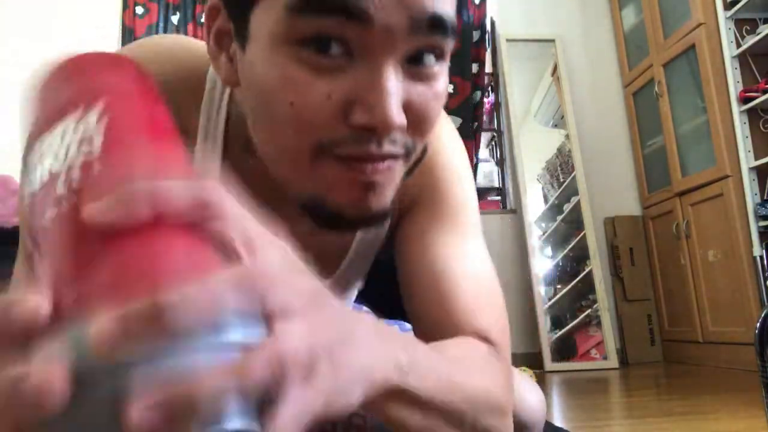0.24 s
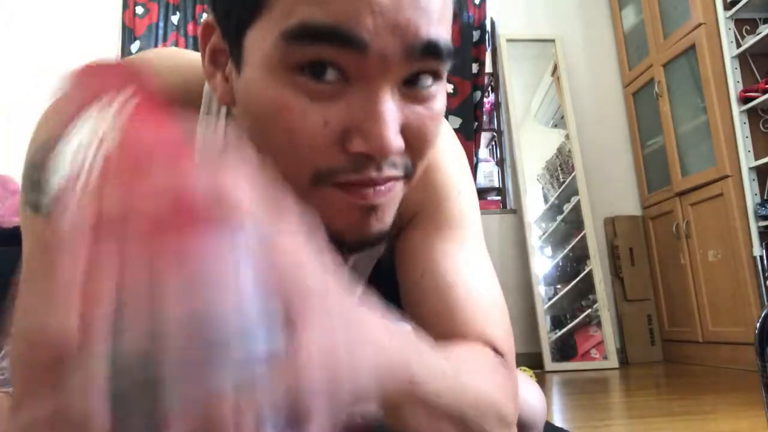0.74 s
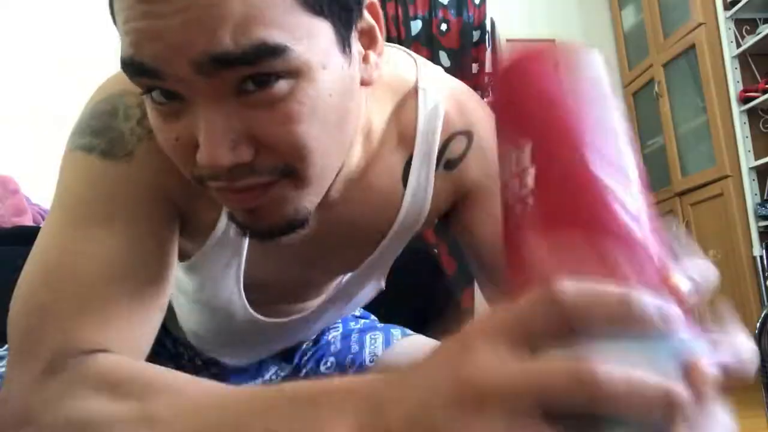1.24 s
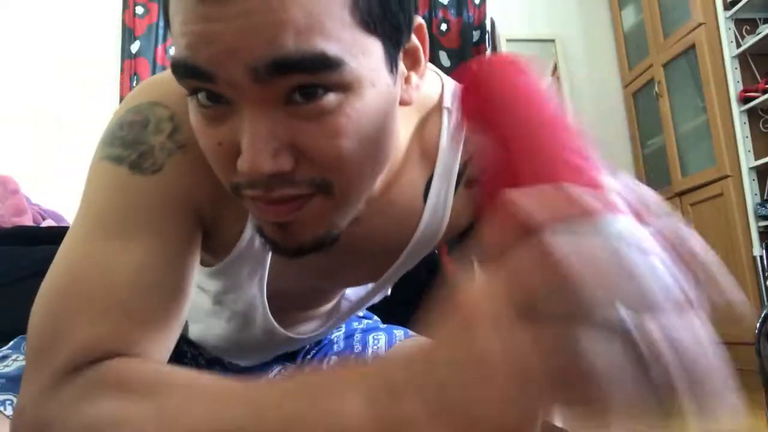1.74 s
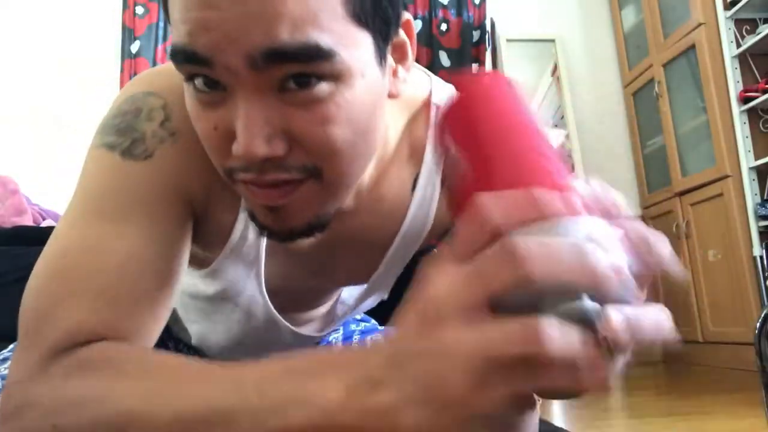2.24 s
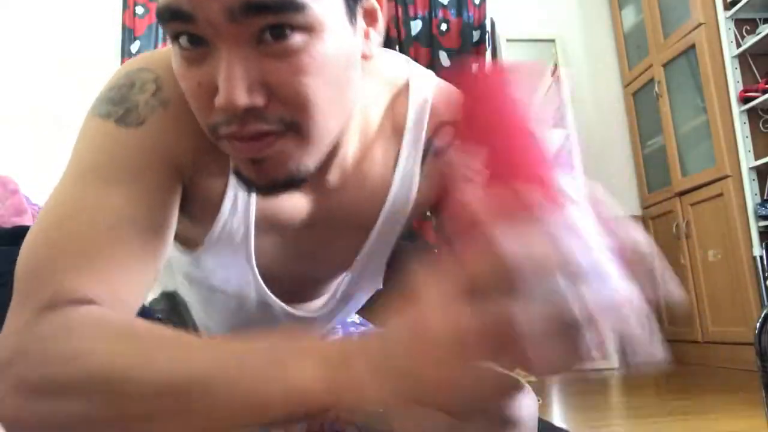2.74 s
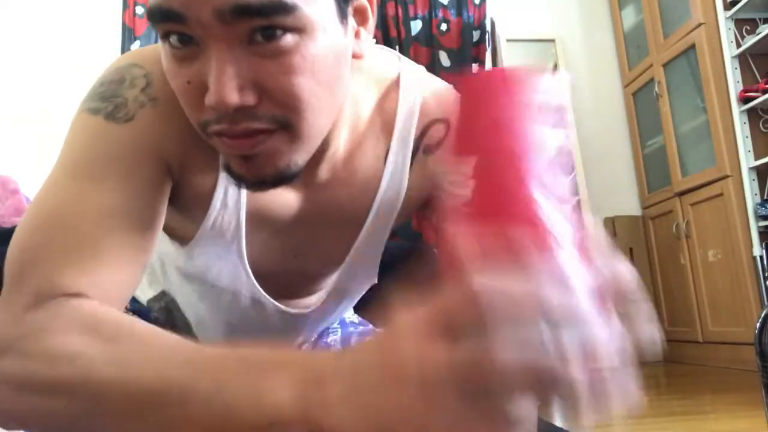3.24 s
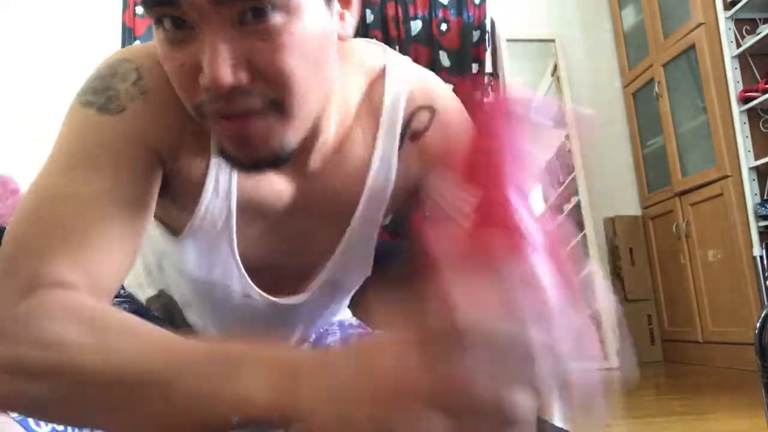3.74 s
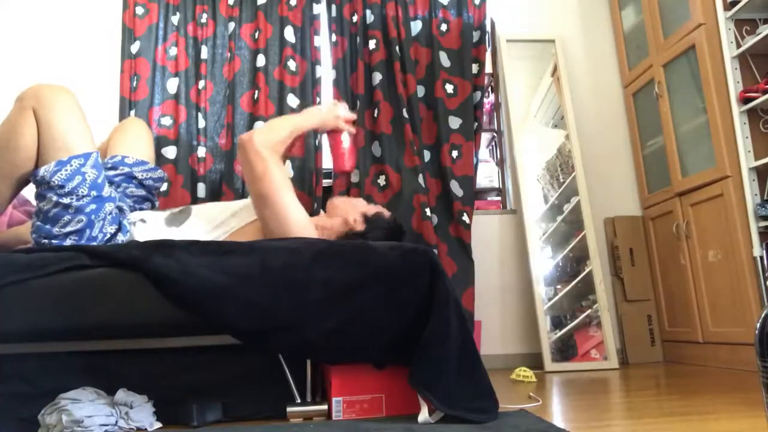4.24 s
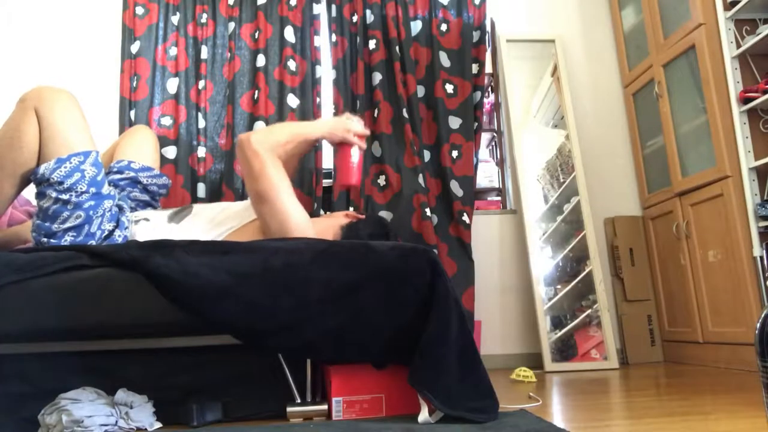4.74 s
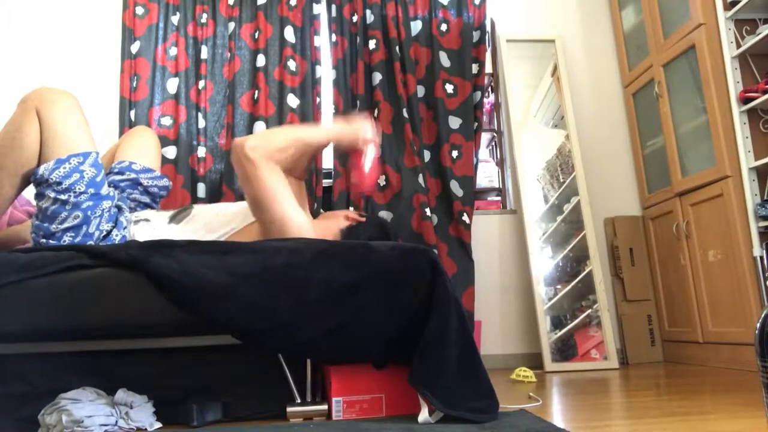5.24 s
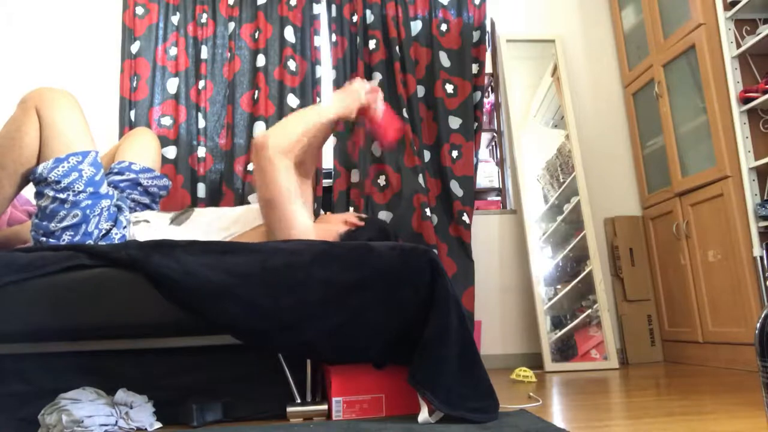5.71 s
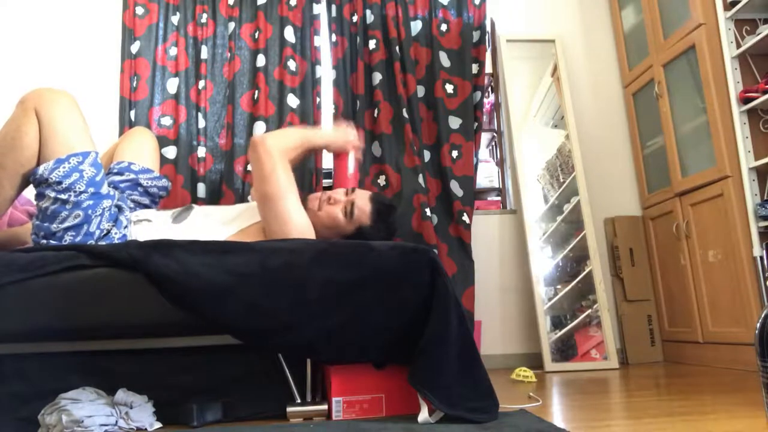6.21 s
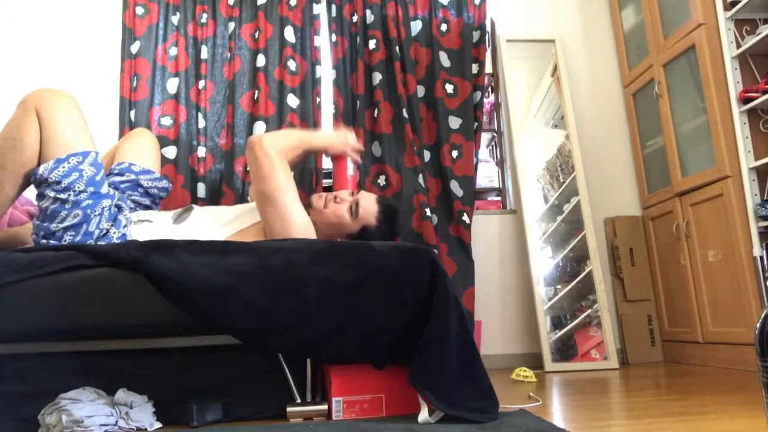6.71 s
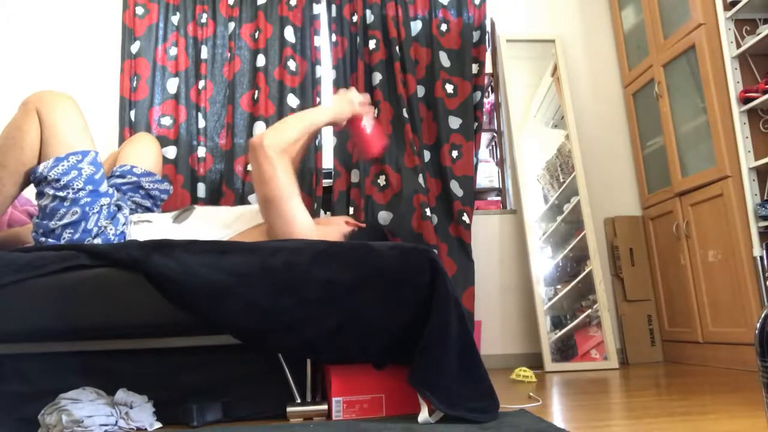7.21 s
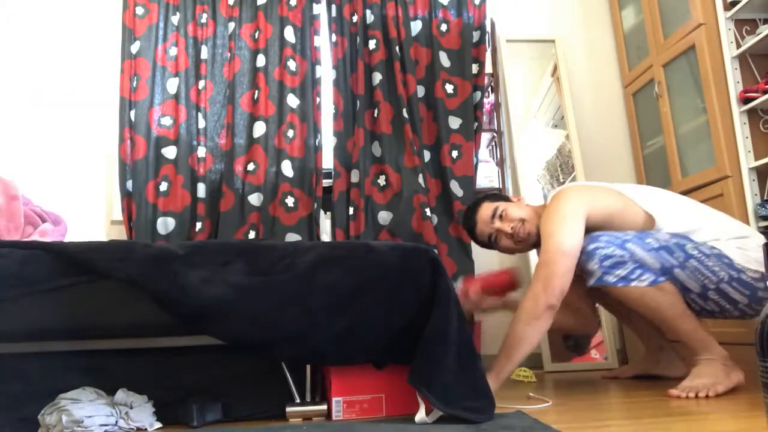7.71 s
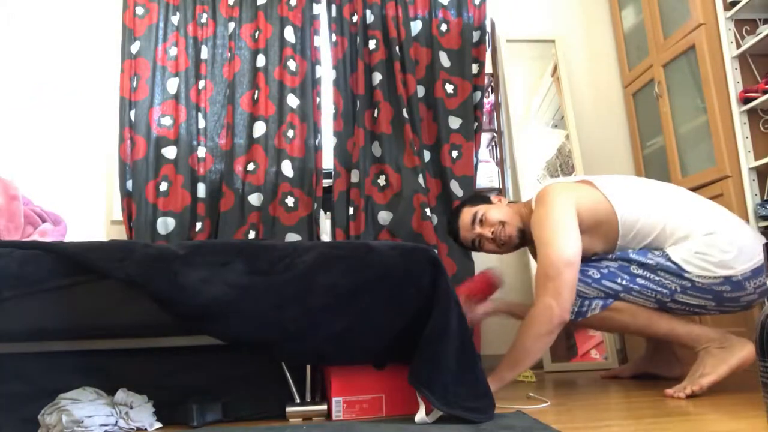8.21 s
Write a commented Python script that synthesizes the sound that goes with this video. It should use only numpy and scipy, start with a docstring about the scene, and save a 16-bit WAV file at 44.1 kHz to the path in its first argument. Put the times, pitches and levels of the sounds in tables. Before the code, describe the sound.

From 0 seconds a plastic shaker bottle is shaken hard at arm's length from the microphone. A loose mixer hits the wall and lid in quick, uneven blows, around ten or more a second, hollow and clacking with brief bright clicks; some land with a duller thud as the liquid slams the end. Each blow throws up a short splash, with bubbly gurgle and frothy hiss between. Especially strong knocks come near 0.3, 0.5, 1.7 and 3.3 seconds. Just after 4 seconds the bottle is suddenly across the small, quiet bedroom: blows are sparser, rounder and more reflected, the slosh fainter, though sharp knocks stand out near 5.9 and 7.0. At about 7.8 a soft, low bump sounds once. Lighter rattling continues until the end at about 8.4, over faint low room air.

```python
"""Shaker bottle in a bedroom

A plastic bottle of water and powder is shaken hard in a small, quiet room: ringing modes make the blows,
in which the mixer knocks on the wall alone or slams into an end with the drink. Bubbles and shaped noise
make the drink, which splashes at each blow and rolls over in the longer pauses. The bottle is at arm's
length for four seconds, then across the room, where one soft thump, two low sines, sounds."""
import sys
import numpy as np
from scipy import signal
from scipy.fft import rfft, irfft, next_fast_len
from scipy.io import wavfile
from scipy.ndimage import map_coordinates

SR = 44100
rng = np.random.default_rng(int(sys.argv[2]) if len(sys.argv) > 2 else 0)


def to_wav(sig):
    """Store sig (one row per channel, or 1-D mono) as 16-bit WAV at the path in sys.argv[1].

    Samples outside -1..1 are clipped; the rate is SR.
    """
    pcm = np.clip(np.atleast_2d(sig), -1, 1) * 32767
    pcm = np.round(pcm).astype(np.int16)
    wavfile.write(sys.argv[1], SR, pcm.T)  # frames by channels


N = 373086
TIME = np.arange(N) / SR


def amp(db):
    """Decibels to gain."""
    return 10 ** (np.asarray(db) / 20)


def unit(x):
    """Scale x to rms 1."""
    return x / np.sqrt(np.mean(x ** 2) + 1e-20)


def burst(x):
    """Scale a short sound to the energy of 10 ms at rms 1."""
    return x / np.sqrt(np.sum(x ** 2) / (SR / 100) + 1e-20)


def along(points, hz):
    """Read (f/Hz, value) points on a log frequency axis."""
    f, value = np.transpose(points)
    return np.interp(np.log(hz + 1), np.log(f + 1), value)


def filtered(x, response):
    """Multiply the spectrum of x by a response of frequency."""
    size = next_fast_len(len(x) + 8192)
    spectrum = rfft(x, size) * response(np.fft.rfftfreq(size, 1 / SR))
    return irfft(spectrum, size)[:len(x)]


def coloured(x, spectrum):
    """Shape x by (f/Hz, level/dB) points, then scale it to rms 1."""
    return unit(filtered(x, lambda hz: amp(along(spectrum, hz))))


def wobble(rate):
    """A smooth random curve with rate knots a second."""
    knots = rng.standard_normal(int(N * rate / SR) + 4)
    return map_coordinates(knots, [TIME * rate])


def add(track, s, sound):
    """Mix a sound into the track at time s, trimming what falls outside."""
    start = round(s * SR)
    part, sound = track[max(0, start):], sound[max(0, -start):]
    part[:len(sound)] += sound[:len(part)]


# Tone of the quiet room's air: (f/Hz, level/dB)
AIR_TONE = [(20, -31), (45, -6), (68, -0.5), (100, -5.5), (200, -7.5), (400, -7.5), (1000, -18.5),
            (4000, -25.5), (16000, -64.5)]


def room_air(db):
    """The quiet room's steady, mostly low noise."""
    return amp(db) * coloured(rng.standard_normal(N), AIR_TONE)


# How long the room holds each pitch: (f/Hz, 60 dB decay t/s)
ROOM_DECAY = [(100, 0.069), (400, 0.46), (2000, 0.33), (6000, 0.18), (14000, 0.24)]


def walls(early_db, early_decay, gap):
    """One answer of the room: after a gap, strong early reflections over a short diffuse tail."""
    hz, t, noise = signal.stft(rng.standard_normal(SR // 3), SR, nperseg=256)
    fade = np.exp(-np.log(1000) * t / along(ROOM_DECAY, hz)[:, None])
    tail = signal.istft(noise * fade, SR, nperseg=256)[1]
    t = np.arange(len(tail)) / SR
    reflected = rng.random(len(t)) < 2500 / SR  # about 2500 reflections a second
    early = rng.standard_normal(len(t)) * reflected * np.exp(-t / early_decay)
    answer = tail / np.linalg.norm(tail) + amp(early_db) * early / np.linalg.norm(early)
    return np.concatenate([np.zeros(round(gap * SR)), answer / np.linalg.norm(answer)])


def in_room(x, direct_db, wet_db, early_db, early_decay, gap):
    """Direct sound plus reflections, redrawn 30 times a second as the bottle moves."""
    out, hop = amp(direct_db) * x, SR // 30
    for start in range(0, N, hop):
        piece = x[start:start + hop]
        if piece.any():
            reflections = signal.fftconvolve(piece, walls(early_db, early_decay, gap))
            add(out, start / SR, amp(wet_db) * reflections)
    return out


def thump(s, db, hz, decay, attack, slap_db, slap_hz):
    """A soft, heavy bump on the floor or bed frame: a brief slap together with a low boom."""
    out, t = np.zeros(N), np.arange(SR // 3) / SR
    boom = amp(db) * np.sin(2 * np.pi * hz * t) * np.exp(-(t / decay) ** 2)
    slap = amp(slap_db) * np.sin(2 * np.pi * slap_hz * t) * np.exp(-t / 0.016)
    add(out, s, (boom + slap) * (1 - np.exp(-t / attack)))
    return out


# How hard the drink is kept churning: (t/s, level/dB)
EFFORT_CURVE = [(0, -33), (0.4, -35), (0.7, -35), (1.3, -34), (2.1, -37), (2.8, -35), (3.3, -38),
                (3.9, -36.5), (4.3, -36.5), (5.1, -42.5), (5.7, -38), (6.25, -36), (6.7, -42), (7.3, -43.5),
                (7.8, -34.5), (8.46, -39)]


def effort(s):
    """Vigour of the shaking at time s, in dB."""
    return np.interp(s, *np.transpose(EFFORT_CURVE))


def surge(rise, fall, rest_db):
    """Drink motion: it swells briefly around each blow, splashes by its weight and rolls over in pauses."""
    splash_at_full_db, splash_per_blow_db, splash_per_effort_db = -16.5, 0.56, 0.65  # dB, dB/dB, dB/dB
    wall_db = -4.5  # a dry knock throws less drink about than a thud
    roll_gap = .11  # s: only a longer pause lets the drink roll over
    roll_place, roll_width = 0.62, 0.1  # shares of the pause
    power = amp(effort(TIME) + rest_db) ** 2
    t = np.arange(-SR // 10, SR // 4) / SR
    splash = np.where(t < 0, np.exp(-abs(t) / rise), np.exp(-abs(t) / fall))
    usual = effort(TIME).mean()
    blow_list = strikes()
    for s, knock, _, drink, _ in blow_list:
        weight_db = knock + 20 * np.log10(np.hypot(amp(drink), amp(wall_db)))
        extra_db = splash_per_effort_db * (effort(s) - usual)
        splash_db = splash_at_full_db + splash_per_blow_db * weight_db + extra_db
        add(power, s + t[0], (amp(splash_db) * splash) ** 2)
    times = blow_list[:, 0]
    for s, pause in zip(times, np.diff(times, append=N / SR)):
        if pause > roll_gap:
            swish = amp(effort(s)) * np.exp(-.5 * (t / (roll_width * pause)) ** 2)
            add(power, s + roll_place * pause + t[0], swish ** 2)
    return np.sqrt(power)


def bubbles(count, low_hz, high_hz, cycles, spread_db, rise, size):
    """A stream of bubbles, each a short damped ring whose pitch rises."""
    when, pitch, strength = rng.random((count, 3)).T[:, :, None]
    hz, t = low_hz * (high_hz / low_hz) ** pitch, np.arange(size) / SR
    age = hz * t / cycles
    loudness = amp(-spread_db * np.log(np.maximum(strength, .02))) * hz / low_hz
    wave = np.sin(2 * np.pi * hz * t * (1 + rise * np.minimum(age, 2)))
    grains = loudness * wave * np.exp(-np.pi * age)
    places = (when * N).astype(int) + np.arange(size)
    return unit(np.bincount(places.ravel(), grains.ravel(), N)[:N])


# Tone of the big bubbles and the wash around them: (f/Hz, level/dB)
GURGLE_TONE = [(60, -5), (200, -3), (370, 0.5), (540, -1.5), (750, 0), (1150, -3.5), (1600, -5.5),
               (2150, -5), (2700, -7), (4500, -30)]


def gurgle(wash_db):
    """Big bubbles ring low in a wash of noise."""
    big = bubbles(count=3200, low_hz=272.5, high_hz=2756, cycles=8.9, spread_db=3.5, rise=0.078, size=900)
    return coloured(big + amp(wash_db) * rng.standard_normal(N), GURGLE_TONE)


# Tone of the fine spatter on the wall: (f/Hz, level/dB)
FROTH_TONE = [(1200, -6.5), (2700, 0.5), (4200, -0.5), (5000, -8.5), (7000, -10.5), (10000, -26),
              (16000, -28)]


def froth(hiss_db):
    """Fine bubbles spatter on the wall under a hiss."""
    fine = bubbles(count=6000, low_hz=2170, high_hz=13800, cycles=2.9, spread_db=-2.5, rise=.03, size=80)
    return coloured(fine + amp(hiss_db) * rng.standard_normal(N), FROTH_TONE)


# Tone of the mixer's light touch on plastic: (f/Hz, level/dB)
TOUCH_TONE = [(200, -23), (500, 1), (1200, 6), (2100, 3.5), (4200, -2.5), (7000, -3.5), (11000, -29.5),
              (16000, -44)]


def touching(x):
    """Give noise the tone of the mixer grazing or chattering on plastic."""
    return coloured(x, TOUCH_TONE)


def grazes(rate):
    """The mixer grazes the wall at random, rate times a second on average."""
    touches = rng.random(N) * (rng.random(N) < rate / SR)
    # each touch decays in about a millisecond
    scrapes = signal.lfilter([1], [1, -np.exp(-1 / (.0012 * SR))], touches)
    return touching(rng.standard_normal(N) * scrapes)


def slosh(gurgle_db, froth_db, wash_db, hiss_db, churn_db, tick_db, tick_rate):
    """Bubbles gurgle and spatter, and the mixer grazes the wall, all carried by the surging drink."""
    flow = surge(rise=0.0097, fall=0.023, rest_db=-7.0) * amp(churn_db * wobble(90))
    body = amp(gurgle_db) * gurgle(wash_db)
    spray = amp(froth_db) * froth(hiss_db)
    return flow * (body + spray + amp(tick_db) * grazes(tick_rate))


SLAM_HZ, SLAM_OCT_PER_DB = 1580, 0.04  # slam's knock centre at 0 dB hardness; harder contact is higher

# Mixer and drink hit an end of the bottle together:
# (t/s, wall knock level/dB, thud over knock level/dB, hardness: lid click over knock level/dB)
SLAM_LIST = [(0.0071, -34.5, -2.5, -1), (0.0613, -30, -4, -3.5), (0.173, -25.5, -9, -1.5),
             (0.3749, -19.5, -4, -8), (0.394, -31.5, -0.5, -1.5), (0.4896, -35, 1, 5.5),
             (0.5164, -38, -4, 4), (0.5742, -17.5, -0.5, -1.5), (0.6925, -34, -6, -16),
             (0.824, -29.5, 0, 1), (0.8881, -16.5, -3, -6), (1.0013, -33, -0.5, -8),
             (1.0542, -31.5, -4, -4.5), (1.1488, -32, -11, 1.5), (1.2219, -16.5, -0.5, -1.5),
             (1.2869, -21.5, -4.5, 7), (1.321, -34, 4, 3), (1.3999, -35, -1, -3.5), (1.4489, -23, 0, 1.5),
             (1.5487, -31, 0.5, -6), (1.5879, -36.5, 10.5, 19.5), (1.6356, -37, 7.5, -4),
             (1.7115, -27.5, 1, -8), (1.8136, -34, 4.5, -14), (1.8913, -29, 1, 3),
             (1.9584, -26.5, -0.5, -5), (2.0104, -26, 4.5, -2.5), (2.0767, -29, 1.5, -8),
             (2.1663, -18.5, -3.5, -4.5), (2.281, -27.5, -4, -3), (2.3208, -26, -1, -2),
             (2.3562, -22, -1, 0.5), (2.5204, -26.5, 3, 3.5), (2.5658, -40.5, 10, 6.5),
             (2.5805, -27.5, -4, -5.5), (2.6652, -21, -5, 0), (2.883, -29, 0.5, -1.5),
             (2.9853, -19, -5.5, -4), (3.1256, -24.5, -3, -1.5), (3.1876, -27.5, -5, -3),
             (3.2163, -28.5, -5, -3.5), (3.29, -34, 1.5, 4.5), (3.45, -28.5, -2, -7.5),
             (3.624, -16.5, -3, 1), (3.7478, -29.5, -0.5, -15), (3.8686, -18.5, -4, -9.5),
             (3.9275, -23.5, -1.5, -14), (4.03, -35, 0, 6), (4.109, -35.5, 10.5, -17),
             (4.154, -40.5, 8.5, -2), (4.303, -32.5, -2.5, -9), (4.442, -29.5, 7, -5.5),
             (4.663, -25.5, 1, -9), (4.76, -20, -3.5, -4), (4.827, -30, 4, -2), (5.015, -29.5, 4.5, -2),
             (5.104, -23, 0, -4), (5.306, -30.5, 2, -1), (5.348, -31.5, 7.5, -3.5), (5.45, -34.5, 6.5, -10),
             (5.523, -34.5, 8, -0.5), (5.595, -31, 2.5, 0.5), (5.673, -27, 3, -1.5),
             (6.033, -26, -1.5, -3.5), (6.08, -33.5, 7.5, 0), (6.167, -22, 3, -6), (6.289, -22.5, -3.5, 1),
             (6.376, -21, 1, -4), (6.548, -39.5, 10.5, -8), (6.659, -37.5, 3.5, -3),
             (6.881, -24.5, -1.5, -7), (7.118, -21.5, 3, -2.5), (7.221, -39, 4, -6), (7.415, -32, 1, -12),
             (7.505, -27, 4, -3), (7.592, -23, -2, -4.5), (7.727, -32, 11.5, -4.5), (8.017, -27, 0.5, -3),
             (8.161, -34.5, 3, -7), (8.252, -28, -4, -0.5)]


def slams():
    """Blows with the drink behind them: a harder contact rings the wall higher."""
    return [(s, db, SLAM_HZ * 2 ** (SLAM_OCT_PER_DB * hard), drink, hard)
            for s, db, drink, hard in SLAM_LIST]


# The mixer runs ahead of the drink and hits alone:
# (t/s, wall knock level/dB, knock centre f/Hz, hardness: lid click over knock level/dB)
KNOCK_LIST = [(0.151, -28.5, 1140, -10), (0.238, -26.5, 1800, -3), (0.2722, -12, 1510, -7.5),
              (0.42, -26, 2100, -6), (0.4565, -9, 1850, -9.5), (0.6408, -32, 1180, -14),
              (0.779, -16.5, 1930, -7.5), (0.879, -23.5, 1480, 4), (0.909, -26, 1410, -7),
              (0.9559, -28, 2440, -2.5), (1.11, -34, 1250, -18), (1.255, -29, 1060, 8.5),
              (1.2996, -26, 1520, -5), (1.492, -24.5, 1900, -4.5), (1.623, -30, 1770, 3.5),
              (1.749, -13.5, 1640, -5.5), (2.3813, -23, 1960, -2.5), (2.4005, -30, 2190, -6),
              (2.701, -19, 2540, -0.5), (2.9578, -22.5, 2690, 5.5), (3.169, -17.5, 1790, -6.5),
              (3.3051, -13, 2080, -6.5), (3.336, -25.5, 2300, 4.5), (3.3507, -26.5, 2450, 2.5),
              (3.529, -31, 1440, -13), (3.5505, -22.5, 1930, -4), (3.6695, -32, 2170, 4),
              (3.8045, -28, 3150, 2), (3.8477, -30, 2580, 1), (4.0001, -15, 2080, -6),
              (4.902, -25.5, 1480, 0), (5.786, -29.5, 1650, -3), (5.939, -17, 2470, -11),
              (7.017, -11.5, 1830, -13), (7.811, -17.5, 1980, -8), (8.077, -31, 1240, -4),
              (8.207, -18, 1560, -9), (8.351, -18, 2350, -17)]


def lone_knocks():
    """Blows without the drink: they hardly move the air pocket, so the thud is 10.5 dB under the knock."""
    return [(s, db, hz, -10.5, hard) for s, db, hz, hard in KNOCK_LIST]


def strikes():
    """All slams and lone knocks by time: t/s, knock/dB, centre/Hz, thud over knock/dB, hardness/dB."""
    return np.array(sorted(slams() + lone_knocks()))


def taps(count, db, spread_db, drink_db, hard_db):
    """After some strikes the mixer bounces back and taps the wall lightly: rows like those of strikes()."""
    times = strikes()[:, 0]
    which, delay = rng.random((count, 2)).T
    s = times[(which * len(times)).astype(int)] + .018 + .04 * delay  # 18 to 58 ms after the blow
    knock, drink, hard = spread_db * rng.standard_normal((count, 3)).T
    centre_hz = np.full(count, SLAM_HZ)
    return np.column_stack([s, effort(s) + db + knock, centre_hz, drink_db + drink, hard_db + hard])


def ring(modes, t, centre_hz, octaves, scatter_db, detune, attack):
    """One blow on a set of modes: the spot hit favours those near centre_hz, moving liquid detunes them."""
    hz, db, t60 = np.transpose(modes)[:, :, None]
    size, shift, phase = rng.standard_normal((3, len(modes), 1))
    favour = np.exp(-.5 * (np.log2(hz / centre_hz) / octaves) ** 2)
    gain = amp(db + scatter_db * size) * favour
    waves = np.sin(2 * np.pi * hz * (1 + detune * shift) * t + np.pi * phase)
    ringing = np.sum(gain * waves * np.exp(-np.log(1000) * t / t60), axis=0)
    return burst(ringing * (1 - np.exp(-t / attack)))


# Modes of the air pocket and the liquid against it: (f/Hz, level/dB, 60 dB decay t/s)
POCKET_MODES = [(162, -12, 0.028), (283, -4.5, .022), (381.4, 2.5, 0.032), (535.6, 0, 0.029),
                (708, -5.5, 0.023)]


def pocket_thud(t):
    """The liquid is shoved into the air pocket, which booms."""
    return ring(POCKET_MODES, t, centre_hz=418, octaves=1.26, scatter_db=4, detune=.1, attack=0.0007)


# Modes of the plastic wall, damped by hand and drink: (f/Hz, level/dB, 60 dB decay t/s)
WALL_MODES = [(853, -1, 0.013), (982, 3, 0.027), (1205, 2, 0.015), (1552, 2.5, 0.0083), (1768, 2.5, 0.011),
              (2100, 1.5, 0.022), (2300, 2, 0.012)]


def wall_knock(t, hz):
    """The plastic wall rings around hz."""
    return ring(WALL_MODES, t, centre_hz=hz, octaves=0.58, scatter_db=4.5, detune=0.045, attack=0.00047)


# Modes of the hard lid and rim: (f/Hz, level/dB, 60 dB decay t/s)
LID_MODES = [(3260, 9, 0.0038), (3280, 0, 0.0058), (4060, 3.5, 0.015), (4360, -1.5, 0.014),
             (5670, -2, 0.016), (6550, 5.5, 0.0099), (7630, -4, 0.0029), (8960, 13, 0.0051)]


def lid_click(t, hz):
    """The hard lid and rim ring briefly around hz."""
    return ring(LID_MODES, t, centre_hz=hz, octaves=0.46, scatter_db=1.0, detune=0.0696, attack=0.00012)


# Tone of the bare contact: (f/Hz, level/dB)
CRACK_TONE = [(1500, -19), (3000, 12.5), (5000, 5.5), (8000, -2.5), (11000, -12.5), (16000, -21)]


def contact_crack(t, decay):
    """The bare contact: a short decaying burst of noise."""
    return burst(coloured(rng.standard_normal(len(t)) * np.exp(-t / decay), CRACK_TONE))


def spiky_noise(t, decay):
    """Noise of uneven spikes that builds within milliseconds, then decays."""
    return rng.standard_normal(len(t)) ** 3 * (1 - np.exp(-t / .004)) * np.exp(-t / decay)


def drop_patter(t, wall, decay):
    """Drops patter on the wall, whose ring is damped by the liquid on it."""
    wetted = wall * np.exp(-t / .003)
    return burst(signal.fftconvolve(spiky_noise(t, decay), wetted)[:len(t)])


def mixer_chatter(t, decay):
    """The mixer chatters on after a blow in uneven rebounds."""
    contacts = np.repeat(rng.exponential(size=len(t)) ** 2, 64)[:len(t)]  # each held for 64 samples
    return burst(touching(spiky_noise(t, decay) * contacts))


def blows(thud_db, knock_db, click_db, crack_db, crack_decay, push_db, patter_db, patter_decay,
          chatter_db, chatter_decay):
    """Each blow cracks, rings lid and wall, and thuds in the pocket; drops patter, the mixer chatters."""
    click_base_hz, click_top_hz, click_oct_per_db = 4270, 5120, 0.05
    out, t = np.zeros(N), np.arange(SR // 12) / SR
    push = amp(push_db) * burst(t * np.exp(-t / 0.0019))  # the whole bottle jolts: one low pulse
    rebounds = taps(count=70, db=-3.5, spread_db=2, drink_db=-3, hard_db=0)
    for s, knock, centre_hz, drink, hard in [*strikes(), *rebounds]:
        thud, click = knock + drink, knock + hard
        # the spot that is hit wanders from blow to blow
        wall_spot, lid_spot = 0.075 * rng.standard_normal(2)  # octaves
        # a hard blow with drink behind it drives the lid's upper modes
        click_hz = min(click_base_hz * 2 ** (click_oct_per_db * (drink + hard)), click_top_hz)
        pocket = push + pocket_thud(t)
        wall = wall_knock(t, centre_hz * 2 ** wall_spot)
        lid = lid_click(t, click_hz * 2 ** lid_spot)
        contact = burst(lid + amp(crack_db) * contact_crack(t, crack_decay))
        patter = amp(patter_db) * drop_patter(t, wall, patter_decay)
        chatter = amp(chatter_db) * mixer_chatter(t, chatter_decay)
        add(out, s, amp(thud + thud_db) * pocket)
        add(out, s, amp(knock + knock_db) * (wall + patter))
        add(out, s, amp(click + click_db) * (contact + chatter))
    return out


def scene():
    """Close by, the direct sound leads; from across the room, the reflections do."""
    air = room_air(db=-46.5)
    bump = thump(s=7.797, db=-20.5, hz=64.4, decay=0.028, attack=0.0033, slap_db=-22, slap_hz=124)
    drink = slosh(gurgle_db=-1.5, froth_db=-9, wash_db=-0.5, hiss_db=12, churn_db=2.5,
                  tick_db=-9.0, tick_rate=80)
    knocks = blows(thud_db=0.0, knock_db=-.5, click_db=0.07, crack_db=-1.5, crack_decay=0.0019,
                   push_db=-22.0, patter_db=-14.5, patter_decay=0.028,
                   chatter_db=-15.0, chatter_decay=0.013)
    bottle = knocks + drink
    far = TIME > 4.08  # s: from here on the bottle is across the room
    close = in_room(bottle * ~far, direct_db=1.5, wet_db=-12.5, early_db=1.5, early_decay=0.035, gap=.005)
    distant = in_room(bottle * far, direct_db=-7.5, wet_db=-5.5, early_db=4.5, early_decay=0.033,
                      gap=0.002048)
    return air + bump + close + distant


def record(dry, low_cut_hz=40, top_hz=16000):
    """The microphone sheds deep bass, peaks beyond full scale clip, and the top is cut off steeply."""
    high_pass = signal.butter(4, low_cut_hz, "highpass", fs=SR, output="sos")
    clipped = np.clip(signal.sosfilt(high_pass, dry), -1, 1)
    return filtered(clipped, lambda hz: 1 / np.sqrt(1 + (hz / top_hz) ** 240))


dry = scene()
out = record(dry)
to_wav(out)
```